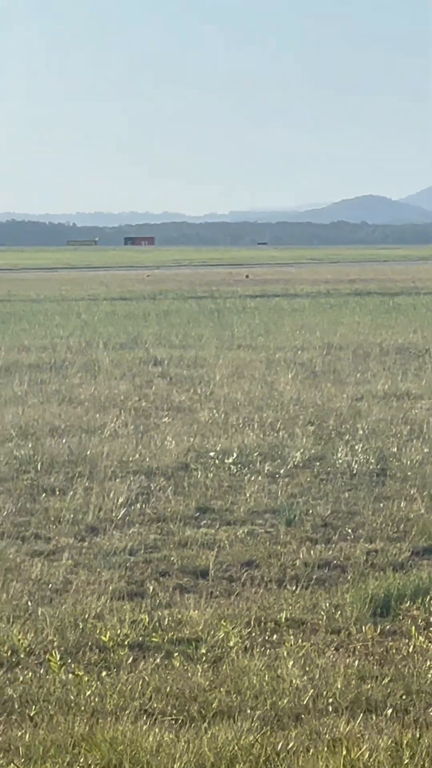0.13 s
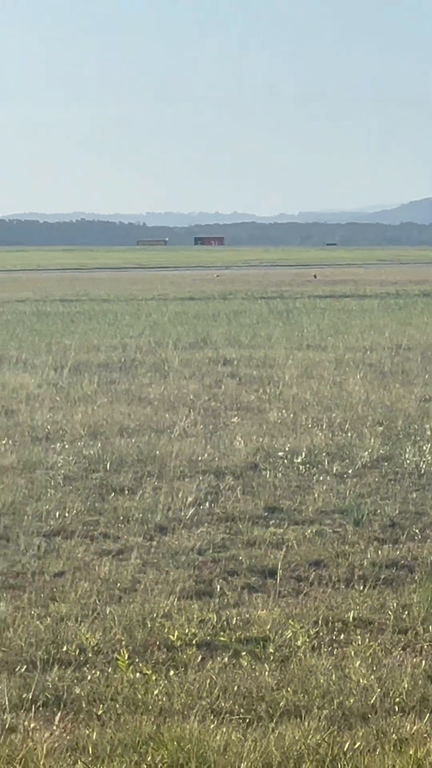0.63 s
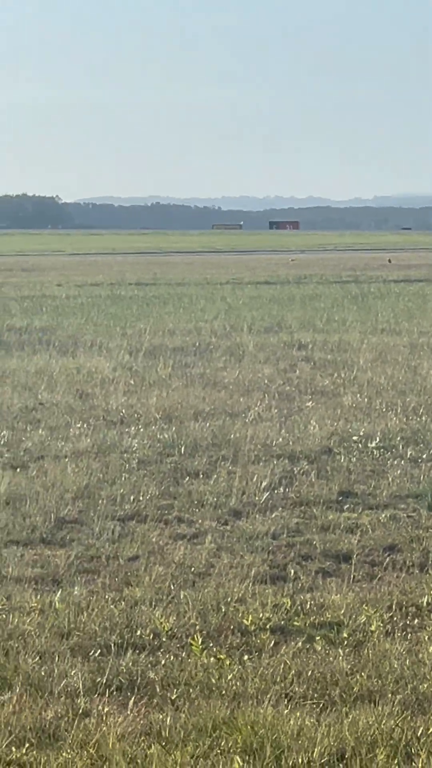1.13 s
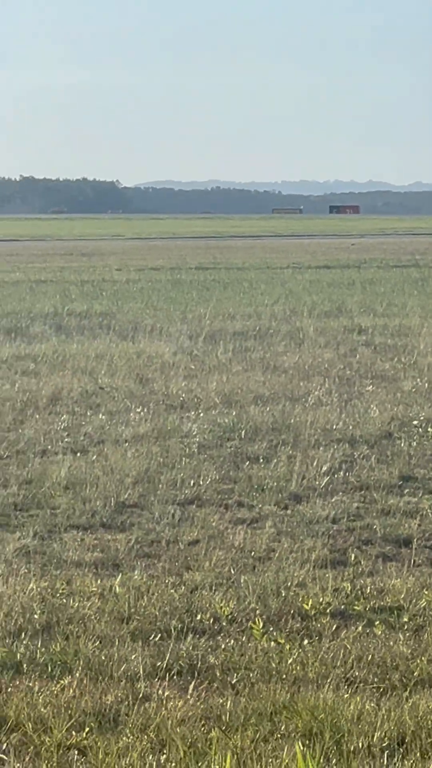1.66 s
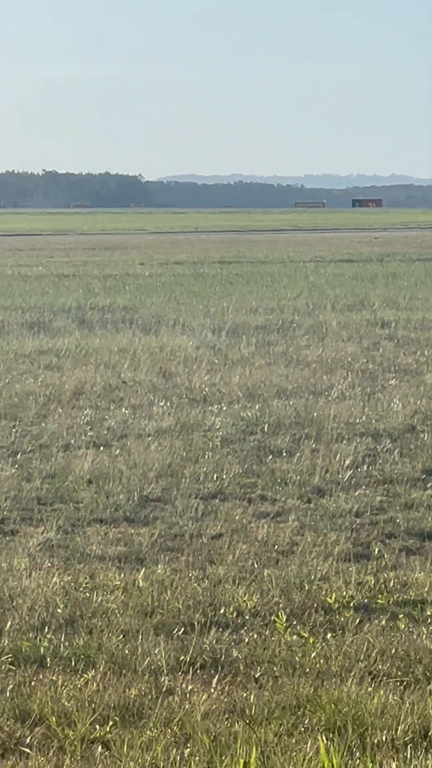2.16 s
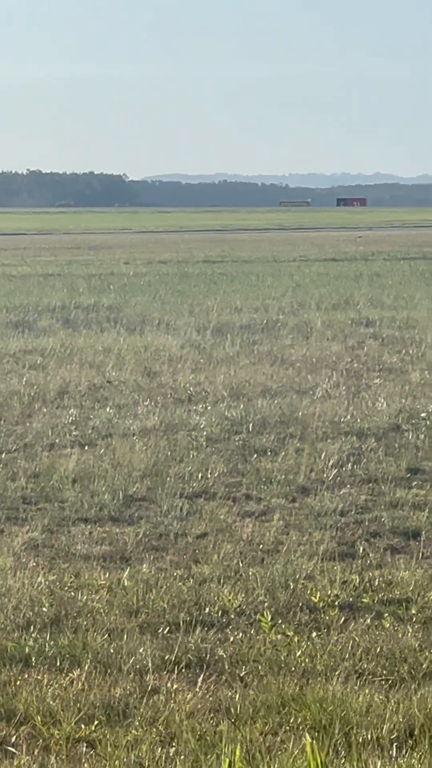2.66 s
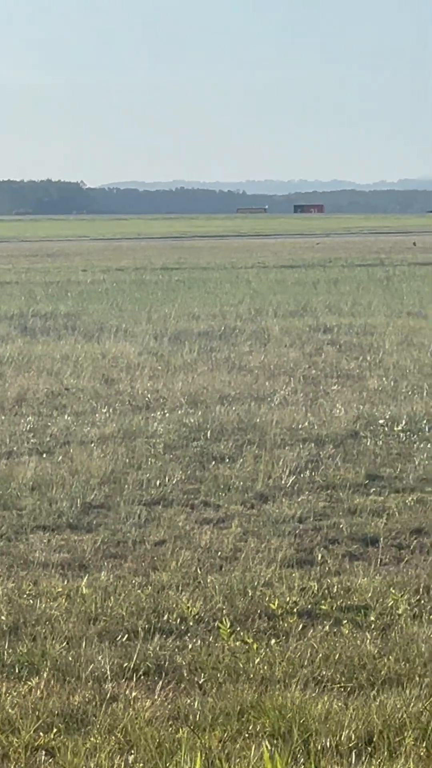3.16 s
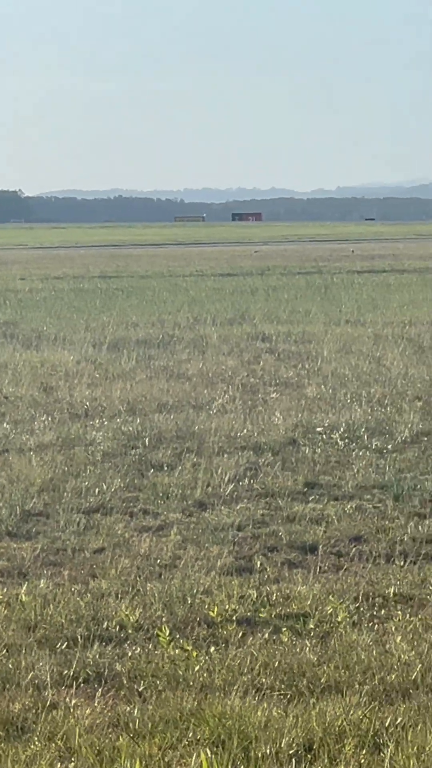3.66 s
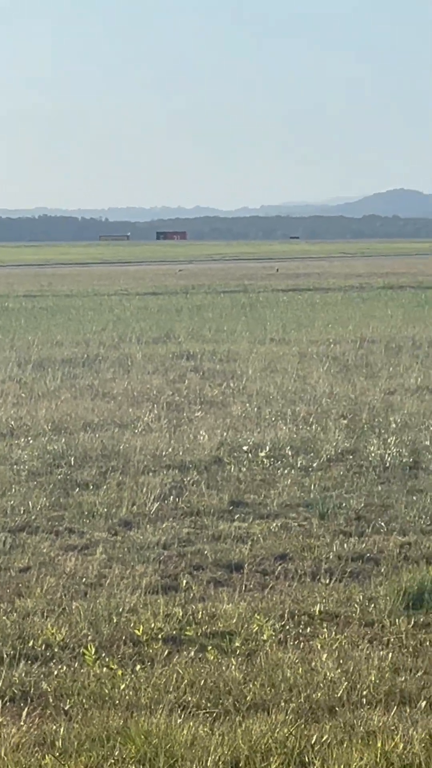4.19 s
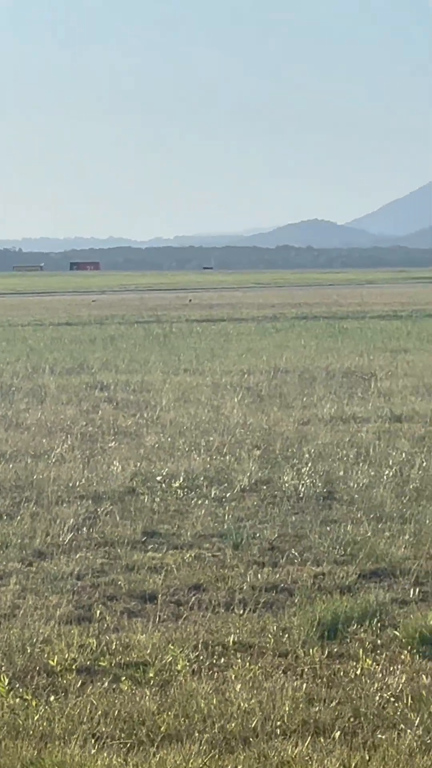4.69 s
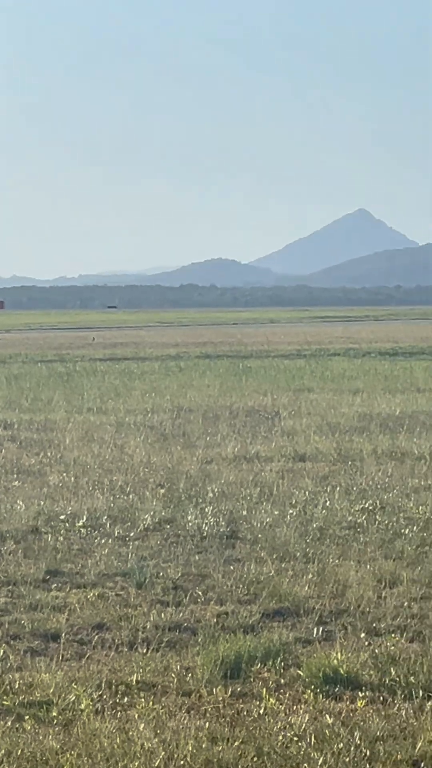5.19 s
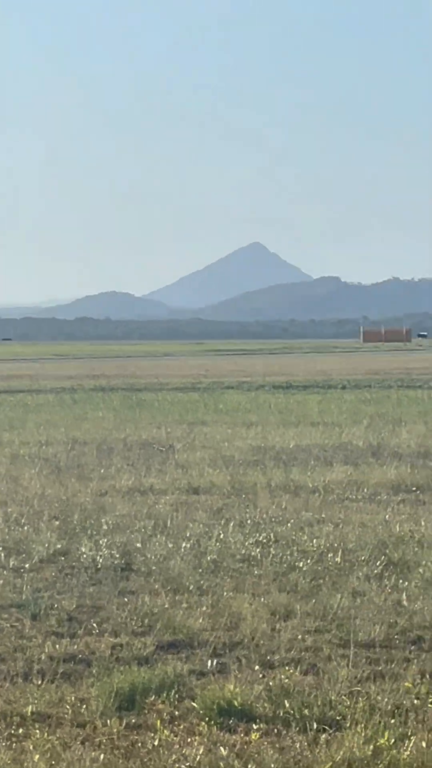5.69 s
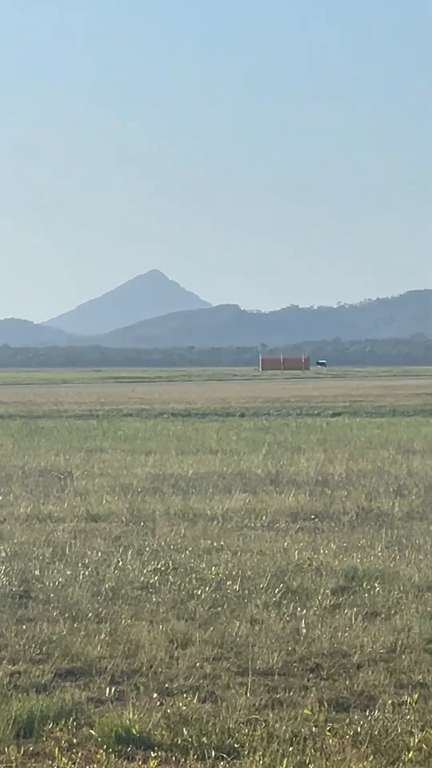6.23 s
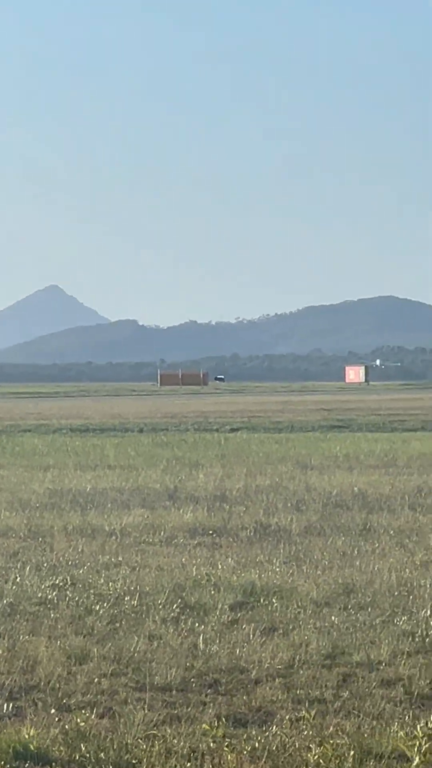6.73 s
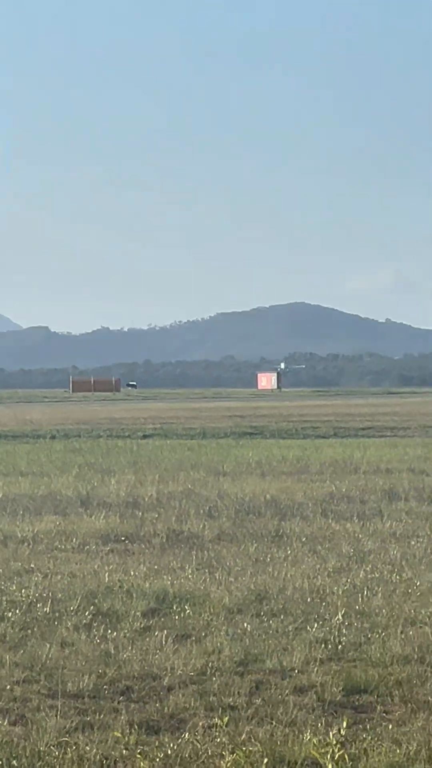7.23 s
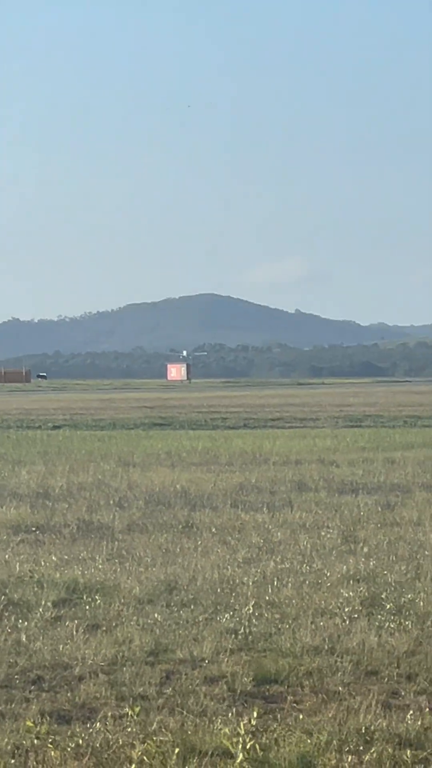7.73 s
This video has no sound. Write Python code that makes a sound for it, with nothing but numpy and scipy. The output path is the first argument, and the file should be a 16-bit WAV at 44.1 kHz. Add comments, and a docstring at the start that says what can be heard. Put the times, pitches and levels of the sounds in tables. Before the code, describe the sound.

On a wide, warm grass airfield, wind buffets a handheld phone with low booms, flutter and sudden puffs, hardest just before the middle. Behind it a far aircraft gives a dull, wavering roar with faint thin hum. A grasshopper buzzes in second-long phrases, a bush cricket ticks about twice a second, a cricket chirps most busily in the first half, and distant crickets trill in swells under a fine insect hiss.

```python
"""Gusts of wind thump, boom and flutter on a phone's two microphone ports, on a wide, warm grass airfield.
The wind is noise of several colours with low swinging booms and sudden puffs. Behind it a far aircraft,
mixed with wind, is a dull, wavering roar of noise with a faint hum of thin tones. In the grass a grasshopper
buzzes in phrases (runs of clicks), a bush cricket ticks (ringing clicks), a cricket chirps (short falling
tones) and far ones trill (wavering tones), amid a high hiss of many insects."""
import sys
import numpy as np
from scipy import signal
from scipy.fft import rfft, irfft, next_fast_len
from scipy.io import wavfile
from scipy.ndimage import uniform_filter1d, map_coordinates

SR = 44100
rng = np.random.default_rng(int(sys.argv[2]) if len(sys.argv) > 2 else 0)


def boost_factor(decibels):
    """Convert a level in decibels to a linear amplitude factor."""
    exponent = np.asarray(decibels, float) / 20
    return 10 ** exponent


def generate_wav(signal):
    """Clip the signal to [-1, 1] and save it as 16-bit WAV at the path in sys.argv[1]."""
    frames = np.transpose(np.atleast_2d(signal))
    scaled = np.clip(frames, -1, 1) * 32767
    pcm = np.round(scaled).astype(np.int16)
    wavfile.write(sys.argv[1], SR, pcm)


N = 346626  # length in samples


def unit(x):
    """The sound scaled to rms 1."""
    return x / np.sqrt(np.mean(x ** 2) + 1e-20)


def along(points, hz):
    """Values between (f/Hz, value) points, read on a log frequency axis."""
    f, value = np.transpose(points)
    return np.interp(np.log(hz + 1), np.log(f + 1), value)


def curves(rows):
    """One value per sample for each column after the time."""
    s, *columns = np.transpose(rows)
    return [np.interp(np.arange(N) / SR, s, column) for column in columns]


def wobble(rate):
    """A smooth random curve through rate random points a second."""
    points = rng.standard_normal(int(N * rate / SR) + 4)
    return map_coordinates(points, [np.arange(N) * rate / SR])


def filtered(x, response):
    """The sound after a filter given as a complex response of frequency."""
    m = next_fast_len(N + 8192)
    return irfft(rfft(x, m) * response(np.fft.rfftfreq(m, 1 / SR)), m)[..., :N]


def coloured(x, colour):
    """The sound given a (f/Hz, level/dB) colour, rms 1."""
    return unit(filtered(x, lambda hz: boost_factor(along(colour, hz))))


def rush(colour, lumpy_db, rate):
    """Coloured noise of rms 1 whose level lurches about rate times a second."""
    lumpy_noise = boost_factor(lumpy_db * wobble(rate)) * rng.standard_normal(N)
    return coloured(lumpy_noise, colour)


def dense(colour, even):
    """Coloured noise of rms 1 with its own swells partly evened out, as in steady turbulence."""
    x = coloured(rng.standard_normal(N), colour)
    power = uniform_filter1d(uniform_filter1d(x * x, size=700), size=700)
    swell = np.sqrt(np.abs(power) + 0.02)
    return coloured(x / swell ** even, colour)


def clicks(s, gain):
    """Single-sample impulses at times s."""
    at = np.round(np.ravel(s) * SR).astype(int)
    inside = (at >= 0) & (at < N)
    return np.bincount(at[inside], np.ravel(gain)[inside], N)


def wavering(hz, waver_hz, flutter_db):
    """A tone of rms 1 whose pitch and level are shaken by the air on the way."""
    turns = np.cumsum(hz + waver_hz * wobble(60)) / SR
    return unit(boost_factor(flutter_db * wobble(25)) * np.sin(2 * np.pi * turns))


def bumps(rows):
    """Sum of bell-shaped gains from (middle t/s, length t/s, peak level/dB) rows."""
    t = np.arange(0, N, 32) / SR
    gain = sum(boost_factor(db) * np.exp(-2 * ((t - s) / length) ** 2) for s, length, db in rows)
    return np.interp(np.arange(N) / SR, t, gain)


# large eddies that boom on the ports: middle t/s, rms level/dB at the peak, pitch f/Hz
BOOMS = [(0.29, -43.5, 87.0), (0.449, -41, 92.0), (0.6, -39, 80.0), (0.63, -41, 65.0), (0.799, -45.0, 91.0),
         (1.068, -44, 75.0), (1.408, -43.0, 84.0), (1.578, -41.5, 81), (1.863, -45, 73.0),
         (2.632, -42.5, 82.0), (2.99, -44, 89.0), (3.196, -40.0, 98.0), (3.437, -40, 88.0),
         (3.53, -36, 96.0), (3.63, -38, 75.0), (3.706, -24, 91), (3.745, -26, 69.0), (3.815, -28.5, 80.0),
         (3.861, -32.5, 86.0), (3.909, -34, 83.0), (3.957, -33, 96), (4.274, -41.5, 77.0),
         (4.436, -43.5, 85.0), (4.651, -40, 90.0), (4.808, -38.5, 88.0), (5.033, -40, 88.0),
         (5.114, -41.5, 73.0), (5.25, -40.5, 79.0), (5.406, -41, 94.0), (5.501, -39.5, 97.0),
         (5.674, -37.5, 71.5), (5.746, -40.0, 70.0), (6.191, -44, 89.0), (6.284, -45, 73.0),
         (6.397, -41.5, 73.0), (6.734, -45.0, 61.0), (6.913, -40.0, 82.0), (6.952, -38.5, 93.0),
         (7.39, -40, 94), (7.468, -44, 82.0), (7.702, -35.5, 91.0), (7.757, -35, 92.0),
         (7.782, -34.0, 89.5)]


def booms(deep_db):
    """Each eddy swings the diaphragm a couple of times, slowing as it passes; lesser ones come all along."""
    boom_turns, pitch_sag = 1.69, .15  # swings in one boom; share by which its pitch falls
    t = np.arange(-SR // 10, SR // 10) / SR
    out = np.zeros(N + SR)
    when, size, pitch = rng.random((90, 3)).T  # lesser eddies at random
    small_db = deep_db[(when * N).astype(int)] + 2 + 7.5 * (size - .5)
    small_hz = np.interp(pitch, [0, 1], (49, 130))
    rows = list(BOOMS) + list(zip(when * N / SR, small_db, small_hz))
    for (s, db, hz), phase in zip(rows, rng.random((len(rows), 1))):
        u = t * hz / boom_turns
        turns = hz * t * (1 - pitch_sag * np.clip(u, -1, 1) / 2) + phase
        swing = np.sin(2 * np.pi * turns)
        out[round(s * SR):][:len(t)] += np.sqrt(2) * boost_factor(db) * np.exp(-2 * u ** 2) * swing
    return out[SR // 10:][:N]


# wind on both ports: t/s, strength level/dB, eddy size level/dB (more = deeper, less = more fluttery)
WIND = [(0, -50.5, 1.5), (.3, -53, 0.5), (.6, -50.5, 0), (.9, -55, 4), (1.32, -47.5, -5.5), (1.5, -54, 4.5),
        (2.07, -55, 2), (2.25, -49.5, -2.5), (3.0, -49, -1), (3.45, -44, 0.5), (3.6, -40.5, -2),
        (3.69, -29, 0.5), (3.8, -44.5, 1), (3.96, -44.5, 2), (4.04, -56.5, 3), (4.6, -49.5, 0),
        (5.1, -51.5, 2.5), (5.3, -44.5, -2.5), (5.9, -49, 1.5), (6.65, -55, 1.5), (6.93, -44.5, -4),
        (7.2, -52, 4.5), (7.4, -44, -1), (7.54, -53, 6), (7.74, -40, -1.5), (7.86, -51, -1)]
# colours of its low, middle and upper parts: f/Hz, level/dB per Hz before scaling
RUMBLE_COLOUR = [(18, -29), (30, -14.5), (42, -1.5), (55, -1), (75, 1.5), (92, -1.5), (115, -17),
                 (200, -58), (400, -120)]
THUMP_COLOUR = [(40, -91), (75, -24.5), (98, -0.5), (165, -3), (210, -19.5), (500, -120)]
FLUTTER_COLOUR = [(60, -96), (140, -13), (185, -0.5), (270, -4.5), (400, -11), (600, -30), (1200, -120)]


def wind():
    """Swirling air presses on both ports alike: deep rumble, thumps and flutter, with booms on top."""
    strength_db, size_db = curves(WIND)
    lurch = boost_factor(2.2 * wobble(20))  # eddies shake low and high parts together
    mean_db = strength_db.mean()
    swing_db = strength_db - mean_db
    # rumble and flutter follow only a share of the swings in strength
    deep_db = mean_db + 0.75 * swing_db + size_db
    flutter_db = mean_db + .45 * swing_db - size_db - 4.5
    rumble = unit(lurch * dense(RUMBLE_COLOUR, even=0.49))
    thumps = unit(lurch * dense(THUMP_COLOUR, even=0.46))
    flutter = unit(lurch ** 1.44 * dense(FLUTTER_COLOUR, even=0.34))
    shared = booms(deep_db)
    shared += boost_factor(deep_db - 2.5 + 2.1 * wobble(11)) * rumble
    shared += boost_factor(strength_db + 1.67 * wobble(11)) * thumps
    shared += boost_factor(flutter_db + 2.44 * wobble(9)) * flutter
    return shared


# wind that pushes the ports apart: t/s, low part level/dB, hiss level/dB over the low part
CROSSWIND = [(0, -64, 0), (.55, -62.5, -1), (.68, -51.5, -4), (.9, -52.5, -5), (1.25, -51.5, -9),
             (1.5, -54.5, -3), (2.0, -64, -2), (2.3, -77, 4), (2.6, -78, 1), (2.79, -62, -10),
             (3.15, -81, 5), (3.45, -56, -9), (3.65, -56, -8), (3.77, -42.5, -13.5), (3.95, -54, -9),
             (4.25, -52, -6), (4.7, -60, -2.5), (5.2, -60, 0.5), (5.42, -50, -1.5), (6.1, -55.5, 0.5),
             (6.4, -51.5, -4), (6.58, -59, -4), (6.82, -53, -6), (7.1, -55, 1), (7.35, -49.5, 1),
             (7.65, -53, 1), (7.86, -42, -1)]
# colours of the low part and the hiss: f/Hz, level/dB per Hz before scaling
CROSS_LOW_COLOUR = [(25, -36.5), (70, 8), (200, 10), (300, -2.5), (500, -58), (900, -120)]
CROSS_HISS_COLOUR = [(60, -104.5), (150, -35.5), (280, 0), (500, -8), (1000, -15.5), (1400, -26),
                     (2100, -120)]


def crosswind():
    """Wind across the ports pushes one while it pulls the other: the same noise, opposite in sign."""
    low_db, hiss_db = curves(CROSSWIND)
    shove = boost_factor(2.7 * wobble(20) + 1.3 * wobble(7))
    low = unit(shove * rush(CROSS_LOW_COLOUR, 0.53, rate=26))
    hiss = unit(shove * rush(CROSS_HISS_COLOUR, 3.7, rate=33))
    return np.outer([1, -1], boost_factor(low_db) * (low + boost_factor(hiss_db) * hiss))


# low roar of aircraft and wind together: t/s, roar level/dB, change in the upper noises level/dB
AIRCRAFT = [(0, -57.5, 0), (1.15, -55, 0.5), (1.3, -54.5, 1.5), (1.52, -55.5, 2), (1.85, -56, 0),
            (2.6, -55.5, -1.5), (3.6, -55.5, -1), (3.9, -55, 1), (4.3, -56.5, 1.5), (4.7, -56, -1.5),
            (5.05, -56, 1.5), (5.4, -55, 1.5), (5.6, -56.5, 2.5), (6.2, -55, -1.5), (6.85, -55.5, 0),
            (7.0, -54.5, 2), (7.3, -57, 0.5), (7.86, -57, 2.5)]
# colours of the four noises: f/Hz, level/dB per Hz before scaling
ROAR_COLOUR = [(100, -19.5), (250, 3), (400, -1.5), (700, -3.5), (1050, -5.5), (1400, -11), (2200, -55),
               (4000, -120)]
RASP_COLOUR = [(500, -96), (1000, -25.5), (1400, -2.5), (1850, 0.5), (2050, -7), (3500, -120)]
WHOOSH_COLOUR = [(1000, -89), (1800, -25.5), (2100, 0), (2600, -0.5), (3000, -16.5), (5000, -120)]
HISS_COLOUR = [(1000, -97), (2000, -20), (2800, 0), (3700, -1.5), (4600, -7.5), (5400, -6.5), (6300, -17.5),
               (7500, -23), (8800, -27.5), (9600, -34), (11500, -120)]
# thin tones: f/Hz, level/dB at the start
HUM = [(300, -63.5), (600, -77), (791, -71), (3254, -85)]


def aircraft():
    """Distance blurs engine and propeller into a dull roar, mixed with wind, and a few thin tones."""
    level_db, upper_db = curves(AIRCRAFT)
    sound = boost_factor(level_db) * rush(ROAR_COLOUR, 0.46, rate=6)
    # each upper noise follows a share of the change
    sound += boost_factor(-66.5 + 0.97 * upper_db) * rush(RASP_COLOUR, .9, rate=6.0)
    sound += boost_factor(-70 + 0.69 * upper_db) * rush(WHOOSH_COLOUR, 1.3, rate=5.9)
    sound += boost_factor(-69 + 0.88 * upper_db) * rush(HISS_COLOUR, 0.96, rate=9.8)
    hum = sum(boost_factor(db) * wavering(hz, waver_hz=3, flutter_db=2.5) for hz, db in HUM)
    fade = boost_factor(-1.1 * np.arange(N) / SR)  # the tones fade as it draws away
    return sound + fade * hum


# far crickets between swells: t/s, level/dB
TRILL_FLOOR = [(0, -75), (2.5, -74.5), (3.3, -74), (5.4, -74.5), (6.3, -74.5), (7.86, -68)]
# the air carries their song in swells: middle t/s, length t/s, peak level/dB
TRILL_SWELLS = [(.01, 0.086, -74), (.33, 0.12, -64), (.58, 0.1, -71), (.79, 0.16, -65.5),
                (1.01, 0.092, -68.5), (1.37, 0.15, -69.5), (1.555, 0.091, -63.5), (1.76, 0.12, -70.5),
                (2.1, 0.23, -75), (2.42, 0.2, -69), (3.03, 0.16, -74), (3.5, .18, -69.5),
                (3.91, 0.097, -70), (4.07, 0.12, -66.5), (4.44, 0.13, -71), (4.68, 0.089, -67.5),
                (5.05, 0.3, -73), (5.75, 0.41, -69.5), (6.08, 0.11, -70.5), (6.28, 0.13, -68.5),
                (6.48, 0.11, -63.5), (6.71, .14, -68.5), (6.93, 0.087, -63.5), (7.09, 0.092, -63.5),
                (7.29, 0.093, -62), (7.52, 0.15, -62.5), (7.84, .12, -64.5)]
# their tones: f/Hz, level/dB relative to the song, pitch waver f/Hz
TRILL_TONES = [(2675, 0, 9), (2635, -3.5, 16), (8016, -31, 90)]


def trill():
    """Far crickets singing without pause merge into fuzzy tones, with a shimmer an octave up."""
    gain = np.hypot(boost_factor(curves(TRILL_FLOOR)[0]), bumps(TRILL_SWELLS))
    tones = sum(boost_factor(db) * wavering(hz, waver, flutter_db=2.6) for hz, db, waver in TRILL_TONES)
    shimmer = unit(filtered(rng.standard_normal(N), lambda f: 1 / (1 + ((f - 5350) / 140) ** 2)))
    slow_gain = uniform_filter1d(gain, size=30000, mode="nearest")  # follows the swells loosely
    return gain * tones + boost_factor(-10.5 + 1.4 * wobble(9)) * slow_gain * shimmer


# phrases: start t/s, end t/s, first level/dB, last level/dB
PHRASES = [(-.35, 0.581, -68, -72.5), (.8, 1.718, -72, -70.5), (1.965, 2.927, -74, -71.5),
           (3.197, 4.15, -70, -70.5), (4.398, 5.33, -71, -67.5), (5.599, 6.55, -68, -67.5),
           (6.86, 7.802, -69, -66)]
# colour of the buzz: f/Hz, level/dB per Hz before scaling
BUZZ_COLOUR = [(6500, -120), (8600, -36), (9600, -21.5), (10400, -8.5), (11400, -2.5), (12300, -5),
               (13900, -5), (14600, -8), (15500, -29), (16500, -120)]


def grasshopper():
    """Leg strokes speed up through each phrase; each drags six pegs over the wing, hardest at its end."""
    peg_clicks, body = np.zeros(N), np.zeros(N)
    for start, end, first_db, last_db in PHRASES:
        t = np.arange(start, end, 1 / SR)
        u = (t - start) / (end - start)
        w = np.clip(u / 0.72, 0, 1)
        strokes = np.cumsum(43.5 + 13.5 * w * w * (3 - 2 * w)) / SR  # 43.5 rising to 57 a second
        edges = np.clip(np.minimum(t - start, end - t) / 0.023, 0, 1)
        gain = boost_factor(first_db + (last_db - first_db) * u) * edges
        peg = np.arange(6 * int(strokes[-1]))
        luck = rng.standard_normal((len(peg), 2))
        s = np.interp(peg / 6 + .012 * luck[:, 0], strokes, t)
        force = boost_factor(np.take([-10, -9, -9, -6, -1, 0], peg % 6) + 2.5 * luck[:, 1])
        peg_clicks += clicks(s, force * np.interp(s, t, gain))
        body += clicks(t, gain * (.75 + .25 * np.cos(2 * np.pi * (strokes - .8))))
    pegs = filtered(peg_clicks, lambda hz: boost_factor(along(BUZZ_COLOUR, hz) + 32.0))
    rasp = body * rush(BUZZ_COLOUR, 2.5, rate=1000)  # grass scatters the clicks into a rasp
    return pegs + boost_factor(-1.0) * rasp


# colour of the insect chorus: f/Hz, level/dB per Hz before scaling
CHORUS_COLOUR = [(8500, -120), (9500, -21), (10300, -15), (11200, -3), (12600, -5), (13200, -4.5),
                 (15600, -10), (16500, -120)]


def chorus():
    """Many insects in the field blend into a high, unsteady hiss."""
    return boost_factor(-75.0) * rush(CHORUS_COLOUR, 1.7, rate=40)


def faint_hiss():
    """A faint high hiss, the same in both channels."""
    colour = [(8000, -88), (10400, -0.5), (12300, -3), (13100, -49), (14000, -120)]
    return boost_factor(-90.5) * rush(colour, .6, rate=36)


# near cricket, two wing strokes a chirp: t/s, typical peak level/dB, gap between the strokes t/s
CHIRPS = [(.1287, -76, 0.03), (0.324, -68, 0.029), (.644, -70, .026), (0.7433, -70, .032),
          (.8465, -69, .026), (1.215, -76, .028), (1.74, -73, .034), (1.8, -69, 0.035),
          (1.9076, -68, 0.023), (1.9949, -69, 0.033), (2.0997, -65, .033), (2.2009, -68, .029),
          (2.3142, -66, .026), (2.4199, -65, 0.032), (2.5282, -66, 0.053), (2.636, -63, 0.045),
          (2.7522, -64, .033), (2.847, -66.5, .033), (2.9532, -68, .0265), (3.052, -67, .03),
          (3.1533, -65, 0.032), (3.263, -64.5, .029), (3.3653, -65.5, .03), (3.4706, -64.5, 0.033),
          (3.5768, -67, 0.052), (3.6806, -64, .0495), (3.8028, -65, 0.031), (3.9041, -67, .0285),
          (4.0038, -65, .0305), (4.1031, -69, .028), (4.2034, -69, 0.033), (4.3057, -72, .027),
          (4.4389, -71, 0.032)]
# its single strokes: t/s, typical peak level/dB
LONE_STROKES = [(.2499, -76), (.414, -68), (.9064, -68), (1.0141, -71), (1.4427, -71), (1.5389, -73),
                (1.6088, -75), (4.539, -71), (4.6987, -75), (4.803, -66.5), (4.8928, -73), (5.2096, -69)]


def chirps():
    """Each wing stroke is a short tone that falls as the scraper slows; weaker neighbours chirp all along."""
    slow_gap_s, long_s, short_s = .042, .027, .022  # chirps with a wider gap have long strokes
    neighbours = rng.random((320, 2))
    rows = []
    for s, db, gap in CHIRPS:
        length = long_s if gap > slow_gap_s else short_s
        rows += [(s, db, length), (s + gap, db, length)]
    rows += [(s, db, short_s) for s, db in LONE_STROKES]
    rows += [(a * N / SR, -87 + 7 * b, .02) for a, b in neighbours]
    out = np.zeros(N + SR)
    for s, db, length in rows:
        u = np.arange(round(length * SR)) / (length * SR)
        hz = 5050 + 25500 * length * (1 - u) ** .7  # longer strokes start higher
        tone = np.sin(2 * np.pi * np.cumsum(hz) / SR)
        stroke = boost_factor(db + rng.normal(0, 1.2)) * np.sin(np.pi * u) ** 0.67 * tone
        out[max(round((s - .004) * SR), 0):][:len(u)] += stroke
    t = np.arange(SR // 20) / SR
    scatter = rng.standard_normal(len(t)) * boost_factor(-60 * t / 0.015)  # grass and ground smear each stroke
    smear = signal.fftconvolve(out, scatter / np.linalg.norm(scatter))
    return out[:N] + boost_factor(-13) * smear[:N]


# ticks: t/s, peak level/dB
TICKS = [(0.1508, -56), (0.586, -55), (1.0501, -57), (1.52, -57), (2.005, -55), (2.4501, -54),
         (2.8668, -54), (3.3222, -55), (3.753, -52), (4.2318, -55), (4.7037, -55), (5.1593, -52),
         (5.6359, -53), (6.0905, -57), (6.4948, -59), (6.9522, -53), (7.4061, -53)]


def bush_cricket():
    """Each tick is four tooth clicks, the last two weaker, ringing a high wing resonance."""
    s, db = np.transpose(TICKS)
    tooth_s = s[:, None] + .00265 * np.arange(4)
    teeth = clicks(tooth_s, boost_factor(db[:, None] + np.array([21, 21, 17, 15])))
    # resonance at 13800 Hz, 3600 Hz wide, applied three times
    return filtered(teeth, lambda f: (1j * f * 3600 / (13800 ** 2 - f * f + 1j * f * 3600)) ** 3)


# sudden eddies: start t/s, peak level/dB
PUFFS = [(0.251, -38), (0.573, -34.5), (0.673, -39), (0.959, -46), (1.246, -36), (1.312, -29.5),
         (2.521, -48), (2.553, -48), (2.624, -47), (2.757, -40.5), (2.983, -50), (3.436, -39), (3.467, -40),
         (3.649, -37), (3.652, -31.5), (3.683, -28.5), (4.641, -32.5), (5.233, -35), (5.296, -33),
         (5.48, -36.5), (5.631, -39), (5.721, -49), (5.834, -43), (5.914, -34), (6.856, -32.5),
         (6.936, -30), (7.115, -33.5), (7.199, -44), (7.341, -48), (7.376, -39), (7.72, -35),
         (7.775, -27.5)]
# colour of a puff: f/Hz, level/dB per Hz before scaling
PUFF_COLOUR = [(80, -42), (140, 1), (250, 0), (400, -3), (600, -8), (900, -22), (1600, -120)]


def puffs():
    """Sudden small eddies hit both ports as short bursts of noise."""
    length_s, rms_db = .021, -10  # rms under the peak
    gain = bumps([(s + length_s / 2, length_s * 0.76, db + rms_db) for s, db in PUFFS])
    return gain * dense(PUFF_COLOUR, even=1.0)


# how far the left channel leads the right: f/Hz, phase/radians
LEAD = [(200, 0), (690, -.8), (1030, 0), (4480, 0), (4820, -1.4), (5250, -5.1), (5750, -2 * np.pi),
        (8790, -2 * np.pi), (10100, -7.9), (12500, -8.7), (13100, -3 * np.pi)]
# left channel over right: f/Hz, level/dB
BALANCE = [(450, 0), (700, -2.5), (1060, -3.5), (1500, -1), (1950, 0)]


def stereo(field):
    """The phone's stereo processing sets a level and phase difference between left and right."""
    def half(hz):
        """Half of the difference, for the left; the right gets its inverse."""
        return boost_factor(along(BALANCE, hz) / 2) * np.exp(.5j * along(LEAD, hz))
    return filtered(field, lambda hz: np.array([half(hz), 1 / half(hz)]))


def scene():
    """Sounds from the field are spread over two channels; wind and a faint hiss are added to these."""
    gusts = wind() + crosswind()
    field = aircraft() + trill() + grasshopper() + chorus() + chirps() + bush_cricket()
    return stereo(field) + gusts + faint_hiss() + puffs()


def band_limit(x):
    """A steep low-pass at the top of the band."""
    return signal.sosfilt(signal.butter(12, 15740, fs=SR, output="sos"), x)


def record(dry):
    """The phone takes in the finished mix of both channels."""
    return band_limit(dry)


dry = scene()
out = record(dry)
generate_wav(out)
```